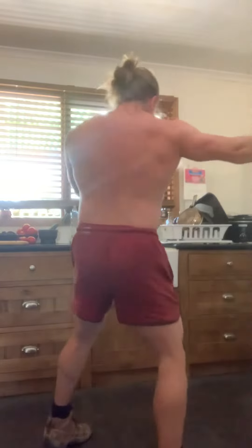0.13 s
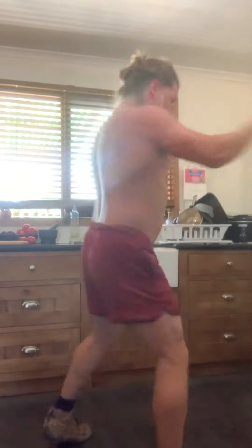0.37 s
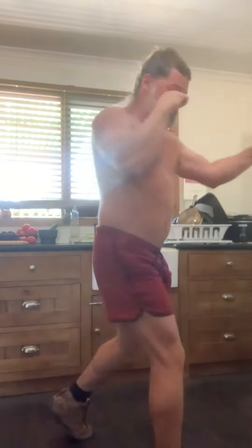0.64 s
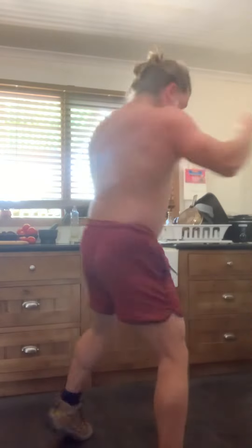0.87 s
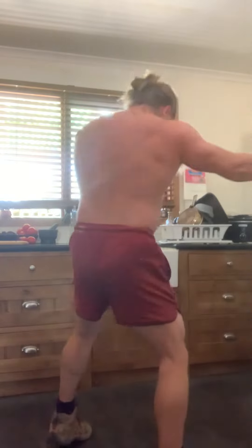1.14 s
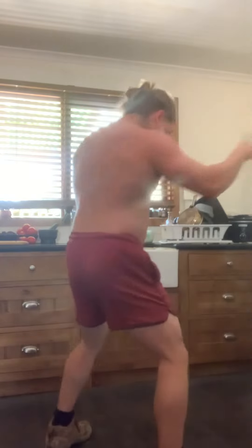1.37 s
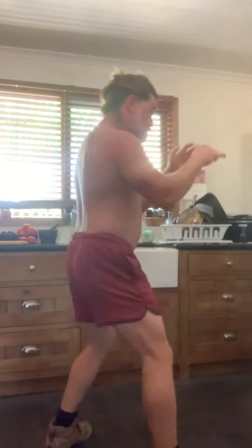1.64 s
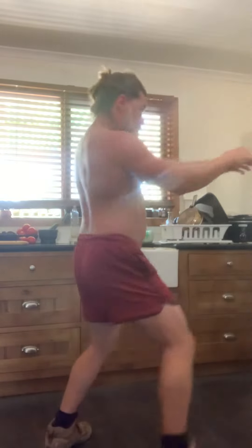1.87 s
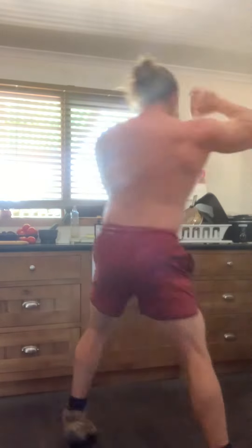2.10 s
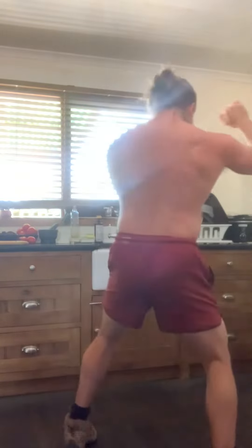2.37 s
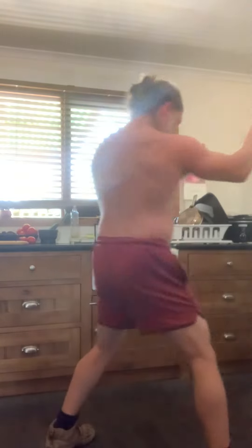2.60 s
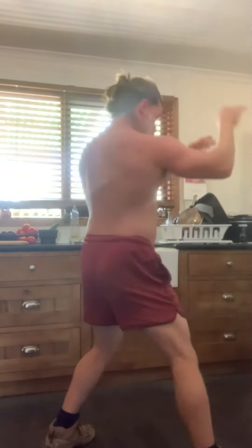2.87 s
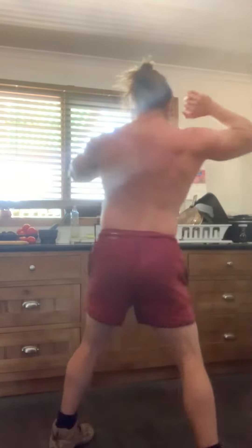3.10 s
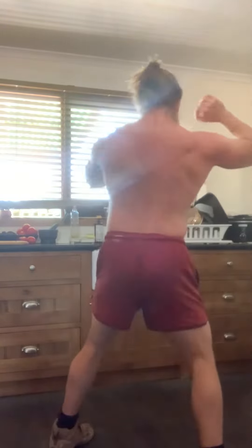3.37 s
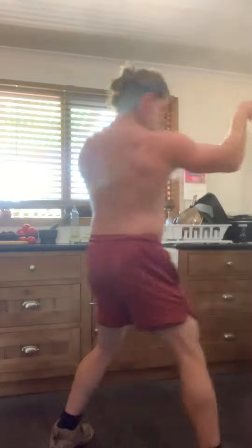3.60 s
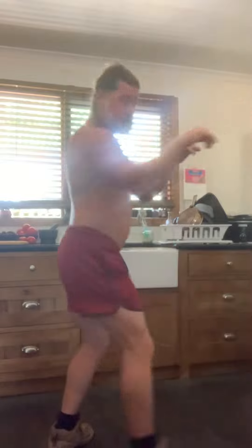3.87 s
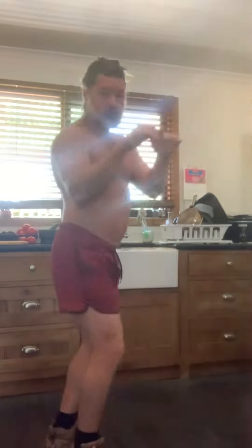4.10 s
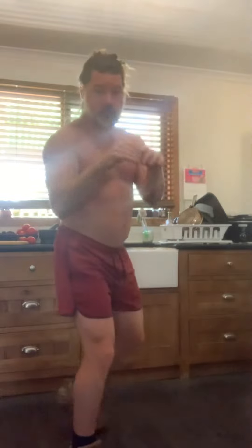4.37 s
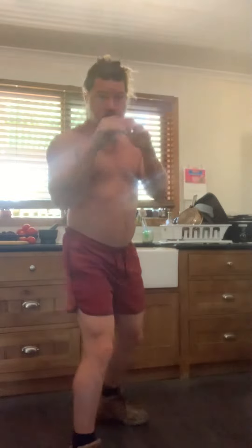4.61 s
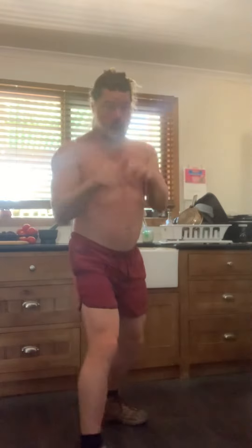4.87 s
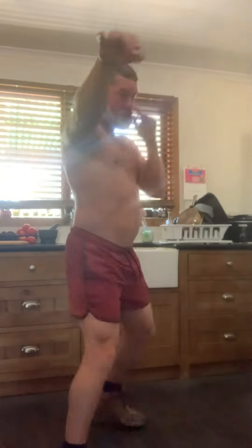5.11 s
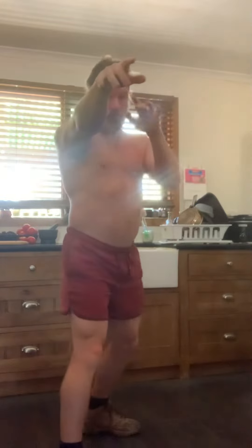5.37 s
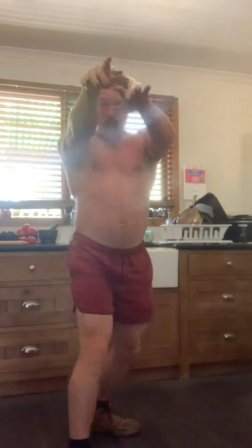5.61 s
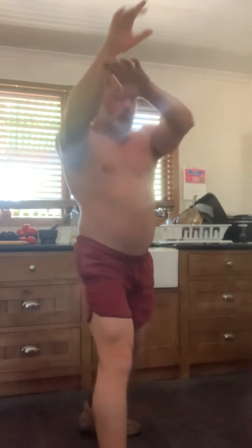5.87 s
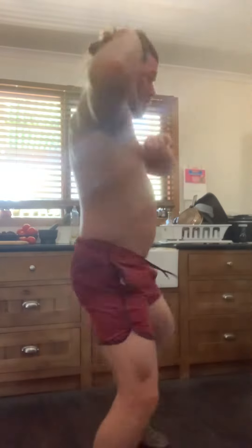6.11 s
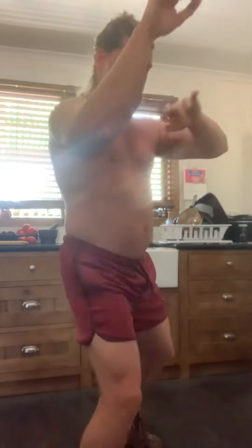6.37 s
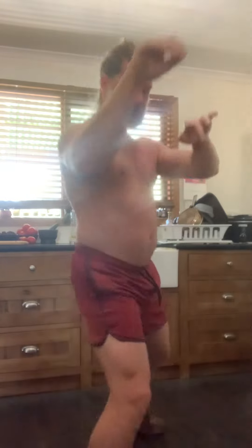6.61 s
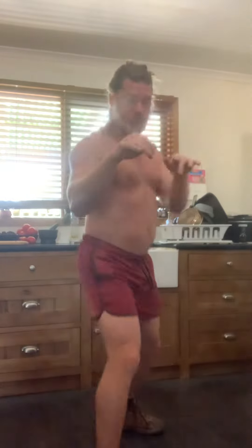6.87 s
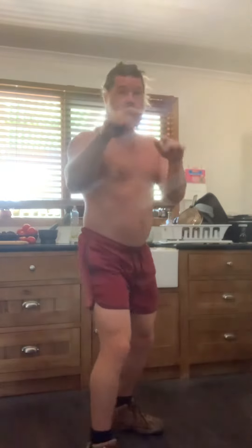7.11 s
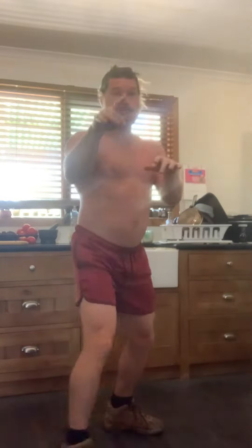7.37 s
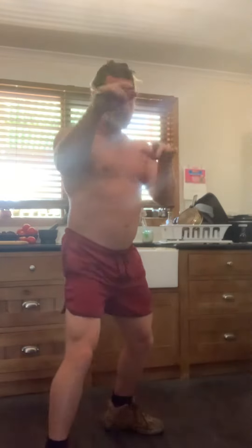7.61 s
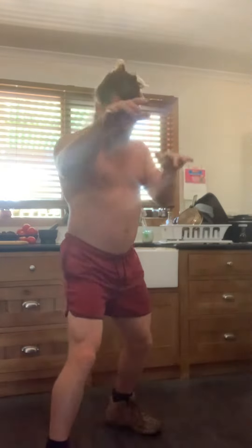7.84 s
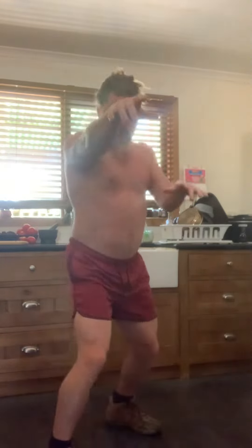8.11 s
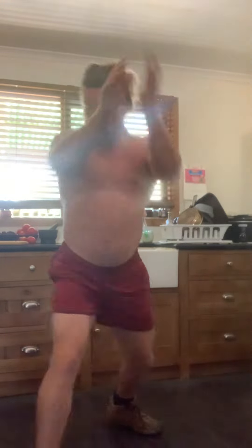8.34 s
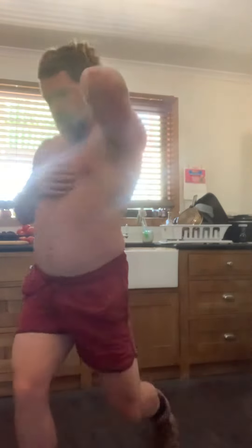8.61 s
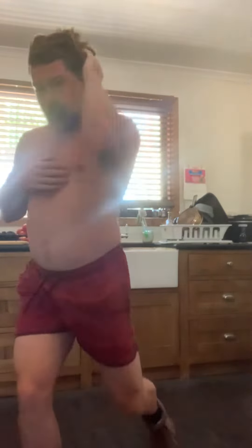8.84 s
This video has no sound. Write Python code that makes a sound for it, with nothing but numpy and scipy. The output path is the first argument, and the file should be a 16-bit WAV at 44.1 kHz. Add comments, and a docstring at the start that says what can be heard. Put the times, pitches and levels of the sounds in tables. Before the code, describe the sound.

A small, hard kitchen with a faint wavering fridge hum and low rumble, heard by a phone a few metres away. For the first second there are only very faint sole scuffs. A soft thud lands at 1.3, then a closer pair of low, bassy steps around 2.0 to 2.1, and lighter ones at 2.6 and 3.0. A firmer step and short scrape come at 3.7, a crisp slap at 4.1, then several dull taps from 4.5 to 5.1. A gritty tap at 5.6 leads to the heaviest stomps at 5.9 to 6.1, cracking and booming through the boards. Smaller steps at 6.6 and airy scuffs until 7.0 follow. At 7.4 to 7.6 a quick run of slaps crackles with bright grit and a dragging scrape. Light clicks at 8.1 precede a deep double stomp at 8.4, then the sound settles to faint scuffs.

```python
"""Work boots step, stomp and slide on a sprung kitchen floor a few metres from a phone.
Soles slap in bursts of tiny impacts, grit ticks in short clicks, and dragged soles scrape in dense grains.
The boards thud and the joists boom as ringing tones that swell and die away; a small hard room echoes.
Behind them a fridge hums in wavering tones over a low noise rumble.
The phone's two ports shift each other's phase."""
import sys
import numpy as np
from scipy import signal
from scipy.fft import rfft, irfft, next_fast_len
from scipy.io import wavfile
from scipy.ndimage import uniform_filter1d

SR = 44100
rng = np.random.default_rng(int(sys.argv[2]) if len(sys.argv) > 2 else 0)


def boost(x):
    """Linear amplitude factor 10**(x/20) for a level x in decibels (scalar or array-like)."""
    u = np.asarray(x, float) / 20
    return 10 ** u


def log_audio(samples):
    """Write samples as a 16-bit WAV file to the path given in sys.argv[1]."""
    # one column per channel
    frames = np.atleast_2d(samples).T
    # limit to full scale, then quantise
    limited = np.clip(frames, -1, 1)
    pcm = np.round(limited * 32767).astype(np.int16)
    wavfile.write(sys.argv[1], SR, pcm)


N = 396018
T = np.arange(N) / SR
COARSE = T[::32]  # times for slow envelopes, s
SIZE = next_fast_len(N + SR)  # room for an echo after the end
F = np.arange(SIZE // 2 + 1) * SR / SIZE  # frequency of each bin, Hz


def over_hz(table):
    """Read a (f/Hz, value) table at every bin, joined on a log axis."""
    hz, value = np.transpose(table)
    return np.interp(np.log(F + 1), np.log(hz + 1), value)


def shape(x, gain):
    """Filter a sound by one gain per frequency bin."""
    return irfft(rfft(x, SIZE) * gain, SIZE)[..., :N]


def unit(x):
    """Scale a sound to rms 1."""
    return x / np.sqrt(np.mean(x ** 2))


def smooth(envelope):
    """Fill in a slow envelope at every sample."""
    return np.interp(T, COARSE, envelope)


def walk(rate):
    """Drift at random with rms 1: levels held for 1 / rate seconds, then smoothed twice."""
    hold = int(SR / rate)
    steps = np.repeat(rng.standard_normal(N // hold + 1), hold)
    return unit(uniform_filter1d(uniform_filter1d(steps, hold), hold)[:N])


def ring(x, modes):
    """Let a sound excite resonances, each applied twice for steep sides, and add them up."""
    out = 0
    for k, (hz, width, db) in enumerate(modes):
        peak = signal.iirpeak(hz, hz / width, SR)
        once = signal.lfilter(*peak, x)
        out = out + (-1) ** k * boost(db) * signal.lfilter(*peak, once)  # neighbours have opposite sign
    return out


def add(out, s, piece, db):
    """Lay a sound in at time s with the given peak level."""
    at = int(s * SR)
    out[at:at + len(piece)] += (boost(db) * piece / np.abs(piece).max())[:len(out) - at]


def swell(s, rise, t60):
    """Come on as a bell curve while the load arrives, then die away by 60 dB in t60 seconds."""
    t = COARSE - s
    return np.exp(np.where(t < 0, -(t / rise) ** 2, -t * np.log(1000) / t60))


def wobbly(hz, rate):
    """Sound a mode whose pitch wanders as the weight on the floor shifts."""
    wander = 0.035  # rms, as a share of the pitch
    return np.sin(2 * np.pi * (np.cumsum(hz * (1 + wander * walk(rate))) / SR + rng.random()))


def fed_mode(s, db, hz, rise, t60, rate):
    """Feed one mode by many landings: their energies add, and the strongest pulls the pitch most."""
    energy = np.array([(boost(level) * swell(at, rise, t60)) ** 2 for at, level in zip(s, db)]) + 1e-18
    total = energy.sum(axis=0)
    return smooth(np.sqrt(total)) * wobbly(smooth(hz @ energy / total), rate)


# What the slapped floor and sole ring with: f/Hz, width of one pass/Hz, level/dB within its group
BODY_MODES = [(387, 92, 0.5), (448.5, 49, -1), (538.5, 203, -2.5), (718.5, 118, -7)]
CRACK_MODES = [(1470, 610, 0.0094), (1976, 460, 0)]
TREBLE_MODES = [(4770, 5500, 9.5), (7900, 4600, 7), (9500, 1800, -41)]
KNOCK_MODES = [(872, 215, 0), (1132, 257, 0.0076)]
EDGE_MODES = [(2466, 450, -1.4), (3190, 1340, -0.65)]
# Sole meets floor: t/s, crack peak level/dB, then edge, treble and body level/dB relative to the crack
SOLE_SLAPS = [(1.3092, -62.5, -10, -24, 8.5), (1.9637, -54, 0, -22, 2.5), (2.0632, -51, -21, -29, 3),
              (2.0737, -43.5, -7.5, -35, 4), (2.5608, -41.5, -19, -55, 1), (2.9512, -59.5, -1, -26, 3.5),
              (3.7249, -46, 7.5, -11, 1.5), (4.1158, -34.5, -0.5, 0, -5.5), (4.5535, -40.5, -9.5, -30, 8.5),
              (4.6334, -54.5, -20, -38, 10), (4.7477, -52, 2.5, -27, 8.5), (4.8798, -55.5, -8, -16, 4),
              (5.012, -49, 0.5, -23, -3), (5.1378, -49.5, -8, -31, 2), (5.6084, -43, -1, -9, -3.5),
              (5.904, -39.5, 0.5, 1, 6.5), (6.0099, -32.5, -9, -11, -4.5), (6.0564, -43, -19, -12, 5),
              (6.0815, -29.5, -4, -5, -3.5), (6.563, -39.5, -8, -33, 2), (6.6655, -42.5, 6, -29, 1.5),
              (7.3991, -38, 1, -3, 2.5), (7.49, -36, 1, -12, -6.5), (7.5524, -32.5, 0, -20, -3),
              (7.569, -42, -12, -22, -2), (7.6271, -37.5, -2, -13, -5), (8.105, -46.5, 0, -2, -2.5),
              (8.1585, -41, -1.5, -5, -5), (8.3739, -36, -9, -39, 1), (8.3978, -35.5, -6, -12, -15),
              (8.4291, -41.5, -19, -19, 6), (8.8637, -52, -17, -43, -6)]


def slaps():
    """One sharp first touch, then a burst of small impacts while the sole flattens."""
    out, t = np.zeros(N), T[:SR // 8]
    chances = rng.standard_normal((len(SOLE_SLAPS), len(t)))
    for (s, db, edge_db, treble_db, body_db), chance in zip(SOLE_SLAPS, chances):
        burst = chance * np.exp(-t / 0.0044) + 9 * (t == 0)
        knock_db = -1.5 + 0.3 * body_db  # set from the body level, for simplicity
        add(out, s, ring(burst, CRACK_MODES), db)
        add(out, s, ring(burst, KNOCK_MODES), db + knock_db)
        add(out, s, ring(burst, EDGE_MODES), db + edge_db)
        add(out, s, ring(burst, TREBLE_MODES), db + treble_db)
        add(out, s, ring(burst, BODY_MODES), db + body_db)
    return out


# Grit cracking under the sole: t/s, peak level/dB
GRIT_TICKS = [(4.1093, -40), (4.118, -41), (5.6086, -29.5), (5.907, -34.5), (5.9273, -40), (5.9462, -35.5),
              (6.0144, -33), (6.0818, -38.5), (6.6658, -48), (7.3994, -40.5), (7.4903, -25.5),
              (7.4988, -30), (7.5098, -26), (7.525, -25.5), (7.5362, -34.5), (7.5463, -32), (7.5573, -23.5),
              (7.6272, -23), (8.1044, -35.5), (8.1597, -29.5), (8.289, -53), (8.3988, -27.5)]


def ticks():
    """Single grains snap: a click with a fraction of a millisecond of splinters."""
    out, t = np.zeros(N), T[:SR // 100]
    chances = rng.standard_normal((len(GRIT_TICKS), len(t)))
    for (s, db), chance in zip(GRIT_TICKS, chances):
        snap = chance * np.exp(-t / 0.00039) + 4 * (t == 0)
        add(out, s, ring(snap, TREBLE_MODES), db)
    return out


# Colour of the scrape, the hiss and the darker rub: f/Hz, relative level/dB per Hz
SCRAPE_COLOUR = [(250, 16.5), (500, -1.5), (900, -5), (1900, 2), (3300, 5), (4600, -5.5), (6000, -18.5)]
HISS_COLOUR = [(3500, 0.5), (5000, -4), (7400, -5.5), (11000, -14)]
RUB_COLOUR = [(300, -15), (600, -8), (1600, -13), (2600, -13.5), (4000, -31.5)]
# Soles dragging and pivoting: middle t/s, scrape level/dB, hiss level/dB relative to the scrape,
# time at full pressure/s
SOLE_DRAGS = [(0.242, -72.5, -16, .005), (0.392, -67.5, -11, 0.036), (0.844, -75.5, -1, 0.053),
              (1.5, -78, -14, 0.0054), (1.812, -67.5, -31, 0.045), (1.997, -65.5, -33, .03),
              (2.105, -72.5, -3, 0.046), (2.763, -67.5, -12, 0.039), (3.045, -67.5, -21, 0.018),
              (3.666, -71.5, -8, 0.011), (3.753, -58.5, -6, 0.0062), (3.9, -64.5, 0.5, 0.16),
              (4.414, -68, -24, 0.0046), (4.697, -69, -18, 0.045), (4.923, -67.5, 0, .005),
              (5.018, -62.5, -42, 0.0057), (5.87, -70, -13, 0.035), (6.016, -59, -25, 0.027),
              (6.13, -63.5, -12, 0.044), (6.802, -67.5, 8.5, 0.083), (6.948, -62, 5, 0.031),
              (7.536, -50.5, -20, 0.029), (7.645, -58, -28, 0.0064), (8.185, -69, -14, 0.016),
              (8.298, -63, -34, 0.0066), (8.418, -53.5, -23, 0.022), (8.568, -83.5, 15, 0.04),
              (8.973, -64, -30, 0.011)]


def drags():
    """Dense grains of uneven size while the sole presses; a harder press digs in and adds a darker rub."""
    dig_db = -48.5  # a drag at this level rubs as strongly as it scrapes
    scrape, hiss, rub = np.zeros((3, len(COARSE)))
    for s, db, hiss_db, hold in SOLE_DRAGS:
        ease = 0.03 + 0.25 * hold  # s, pressure builds and lets go more slowly in long drags
        outside = np.maximum(np.abs(COARSE - s) - hold / 2, 0)  # s away from full pressure
        energy = (boost(db) * np.exp(-(outside / ease) ** 2)) ** 2
        scrape += energy
        hiss += energy * boost(hiss_db) ** 2
        rub += energy * boost(0.5 * (db - dig_db)) ** 2
    flutter = boost(2.2 * walk(70))
    grain_size = boost(3.15 * rng.exponential(size=(3, N)))
    grains = rng.standard_normal((3, N)) * grain_size * flutter
    out = np.zeros(N)
    colours = SCRAPE_COLOUR, HISS_COLOUR, RUB_COLOUR
    for energy, grain, colour in zip((scrape, hiss, rub), grains, colours):
        out += smooth(np.sqrt(energy)) * unit(shape(grain, boost(over_hz(colour))))
    return out


# Boards ringing: t/s a few milliseconds before the swell's top, heel peak level/dB,
# forefoot level/dB relative to the heel, lower mode level/dB relative to the upper, lower mode f/Hz
BOARD_THUDS = [(1.333, -38.5, -10.5, -25, 159.8), (1.434, -48, -3.5, -13.5, 194),
               (1.971, -41.5, 7, 1, 109.3), (2.09, -35, -7, 0.5, 120.8), (2.151, -41.5, -8.5, -10.5, 109.9),
               (2.575, -39.5, 1.5, -6.5, 175), (3.054, -41.5, -3, -15.5, 110.5),
               (3.745, -34.5, -19, -3.5, 191.3), (3.83, -49, -9.5, -8, 110.2), (4.128, -40, 4.5, -9.5, 175),
               (4.564, -36.5, -9.5, -5.5, 180.1), (4.64, -45, 3, -7, 190.8), (4.757, -38, -2.5, -9.5, 194),
               (5.035, -47.5, -2.5, 2, 191), (5.62, -41, -1.5, -11, 190), (5.912, -19, -7, -8, 127.8),
               (6.023, -25, -13, -9.5, 153.7), (6.093, -24.5, -8, -30, 195.3),
               (6.575, -41, 6, -14.5, 196.2), (6.69, -48, 2, 5, 194.5), (6.82, -42.5, -14, -15.5, 129.2),
               (7.083, -47.5, -7, -16, 193.7), (7.413, -27.5, -2.5, -5, 111.3),
               (7.473, -44.5, -2.5, 8.5, 180.4), (7.509, -35, -3, -18, 194.8), (7.546, -30, 2, -26, 194.9),
               (7.615, -41.5, 0, -18, 170.1), (8.115, -47, -6, -4, 174.6), (8.173, -42.5, 0.5, -11, 183.2),
               (8.381, -32.5, 8.5, -9.5, 192.8), (8.418, -25, -3, -5, 192.1),
               (8.451, -33.5, -19, -3, 111.6)]


def thuds():
    """Heel, then forefoot, ring one board mode and a lower one that depends on where the boot lands."""
    board_hz, forefoot_s = 277, 0.02505  # upper mode's middle pitch; forefoot's delay
    rise_s, upper_t60_s, lower_t60_s = 0.00644, 0.11, 0.085
    s, db, forefoot_db, lower_db, lower_hz = np.transpose(BOARD_THUDS)
    s, db = np.append(s, s + forefoot_s), np.append(db, db + forefoot_db)
    upper = fed_mode(s + 0.0046, db, np.full_like(s, board_hz), rise_s, upper_t60_s, 40)
    lower_db, lower_hz = np.tile(lower_db, 2), np.tile(lower_hz, 2)  # same for heel and forefoot
    return upper + fed_mode(s + 0.0037, db + lower_db, lower_hz, rise_s, lower_t60_s, 40)


# Joists booming: t/s at the swell's top, peak level/dB, f/Hz
JOIST_BOOMS = [(1.336, -50, 50.96), (1.989, -33.5, 49.46), (2.066, -33.5, 57.05), (2.166, -43, 54.4),
               (2.276, -53.5, 59.47), (2.583, -42.5, 53.35), (3.772, -41, 63.76), (3.885, -44, 70),
               (4.901, -45.5, 45.13), (4.998, -46, 64.38), (5.057, -46, 46), (5.925, -29, 47),
               (5.954, -26, 51.96), (6.052, -27.5, 44.92), (6.084, -30.5, 48.72), (6.781, -48, 59.16),
               (6.853, -41, 51.16), (7.076, -47.5, 56.3), (7.424, -30.5, 48.7), (7.477, -34.5, 45.53),
               (8.249, -50.5, 47.24), (8.393, -28, 55.03), (8.421, -30, 48.6), (8.473, -23, 53.1),
               (8.681, -45.5, 46.8)]


def booms():
    """The joists take the weight slowly; a weaker, higher partner beats against them."""
    rise_s, t60_s = 0.0095, 0.28
    s, db, hz = np.transpose(JOIST_BOOMS)
    partner = fed_mode(s - 0.004, db - 8, 1.45 * hz, 0.56 * rise_s, 0.695 * t60_s, 23)
    return fed_mode(s, db, hz, rise_s, t60_s, 20) + partner


# How long the room rings: f/Hz, time to fall by 60 dB/s
ROOM_T60 = [(300, 0.3), (2500, 0.3), (10000, 0.16)]


def room(x, count=4):
    """Echo tails of noise that dies faster in the treble; unlike tails crossfade in turn at a steady pace."""
    onset_s, turn_s = 0.006, 0.17  # echoes build up over this; fade from one tail to the next
    hz, t, spec = signal.stft(rng.standard_normal((count, 2, SR // 2)), SR, nperseg=256)
    t60 = np.interp(hz, *np.transpose(ROOM_T60))
    tails = signal.istft(spec * np.exp(-np.log(1000) * t / t60[:, None]), SR, nperseg=256)[1]
    tails = tails * (1 - np.exp(-T[:tails.shape[-1]] / onset_s))
    tails = rfft(tails / np.sqrt(np.mean(np.sum(tails ** 2, axis=-1))), SIZE)  # mean energy 1
    echoes = 0
    for k, tail in enumerate(tails):
        # the tails take turns in a circle
        away = np.abs((T / turn_s - k + count / 2) % count - count / 2)
        share = np.cos(np.pi / 2 * np.clip(away, 0, 1))
        echoes = echoes + rfft(x * share, SIZE) * tail
    return irfft(echoes, SIZE)[:, :N]


# Colour of the low rumble: f/Hz, relative level/dB per Hz
RUMBLE_COLOUR = [(20, -36), (45, -6.5), (80, -7), (125, -10.5), (220, -5.5), (300, -7), (390, -12.5),
                 (440, -17.5), (700, -19.5), (800, -24.5), (1200, -32.5), (2500, -41.5), (4500, -48.5),
                 (8500, -50.5), (11300, -52)]
# Fridge hum: f/Hz, rms level/dB before it wavers
HUM_LINES = [(49, -69.5), (99.5, -68), (199, -65.5), (295, -69.5), (395, -79), (588, -80.5), (2573, -90.5),
             (8301, -102)]


def kitchen():
    """Low rumble whose middle murmurs unevenly, and a compressor hum whose lines waver."""
    noise = shape(rng.standard_normal((2, N)), boost(over_hz(RUMBLE_COLOUR)))
    middle = shape(noise, np.exp(-np.log((F + 1) / 1100) ** 2))  # a wide band around 1100 Hz
    rumble = noise + (boost(2.2 * walk(5.4)) - 1) * middle
    hum = np.zeros(N)
    for hz, db in HUM_LINES:
        level = boost(db + 2.0 * walk(8.1)) * np.sqrt(2)  # rms to peak
        hum += level * np.sin(2 * np.pi * np.cumsum(hz * (1 + 0.00404 * walk(3))) / SR)
    return boost(-59) * unit(rumble) + hum * np.array([[1], [0.6]])  # shared row, diffuse row


# How alike the two ports hear: f/Hz, likeness from 0 to 1
PORT_LIKENESS = [(170, 0.8), (340, .45), (520, 0.29), (900, 0.99), (1400, 0.27), (2500, .5), (3600, 0.43),
                 (5000, 0.86), (9000, .95), (11000, 0.13)]


def scene():
    """A part that both ports share and a diffuse part that differs, mixed by likeness."""
    soles, grit, floor = slaps() + drags(), ticks(), thuds()
    # treble clicks beam at the phone and the boards reach it through the stand, so both echo less
    echoing = soles + boost(-8.0) * grit + boost(-10) * floor
    shared, diffuse = room(echoing) + kitchen()
    like = np.clip(over_hz(PORT_LIKENESS), 0, 1)
    shared = shape(shared + soles + grit + floor + booms(), np.sqrt((1 + like) / 2))
    diffuse = shape(diffuse, np.sqrt((1 - like) / 2))
    return np.array([shared + diffuse, shared - diffuse])


def top_cut(x):
    """Nothing passes above the cut-off."""
    return signal.sosfilt(signal.butter(12, 16290, fs=SR, output="sos"), x)


# Between the ports: f/Hz, phase by which the left leads/radians
PORT_LEAD = [(0, 0), (340, .3), (690, 2.5), (950, 3.6), (1800, 4.6), (2700, 3.7), (4600, 3), (6500, 1.4),
             (8200, 0), (9500, -.2), (11800, -3)]
# Between the ports: f/Hz, left minus right level/dB
PORT_TILT = [(60, .5), (350, .5), (650, 7), (1200, 1.8), (3600, 2.5), (6000, 0)]
# Tone of both ports: f/Hz, gain/dB
PHONE_TONE = [(22, -24.5), (45, 2.5), (11300, 3.5), (12200, -13), (13800, -44), (14600, 12), (15600, -31)]


def record(dry):
    """The phone body turns phase and level between its ports; deepest bass and top fade, but for a narrow peak
    near 14.6 kHz."""
    lead = np.interp(F, *np.transpose(PORT_LEAD))
    half = np.exp(0.5j * lead) * boost(over_hz(PORT_TILT) / 2)  # each port takes half the difference
    mix = shape(dry, boost(over_hz(PHONE_TONE)) * np.array([half, 1 / half]))
    return top_cut(mix)


dry = scene()
out = record(dry)
log_audio(out)
```